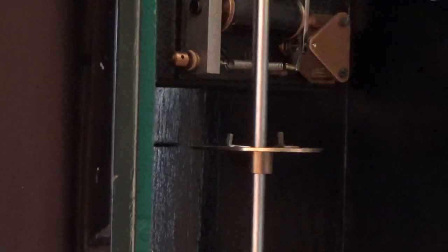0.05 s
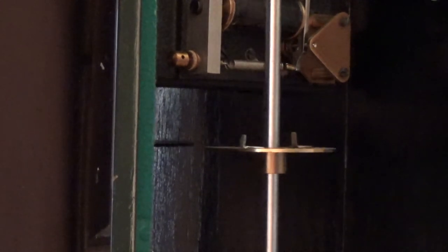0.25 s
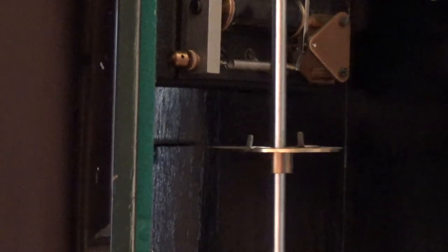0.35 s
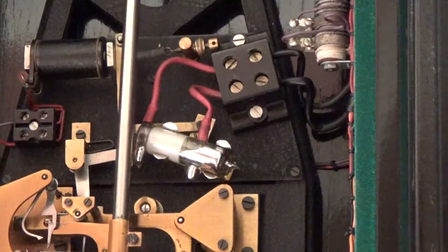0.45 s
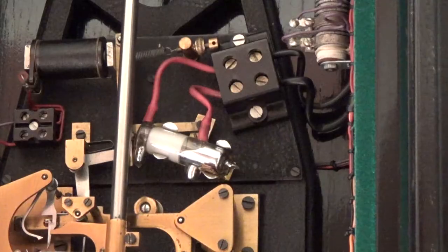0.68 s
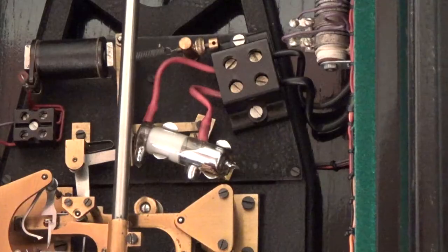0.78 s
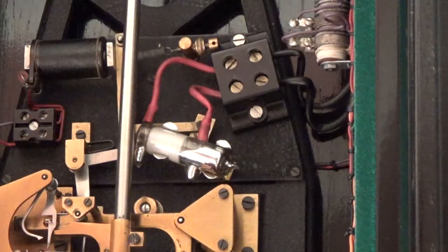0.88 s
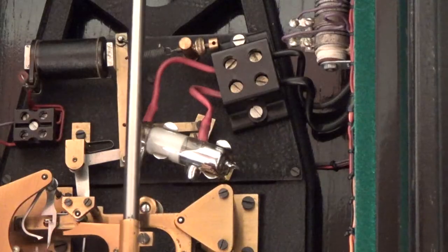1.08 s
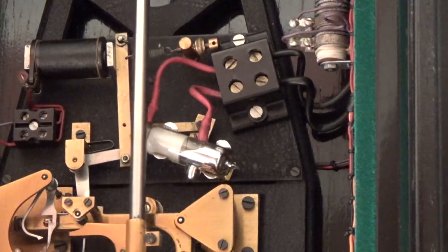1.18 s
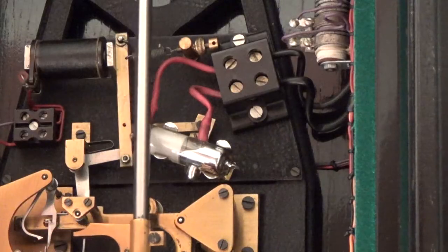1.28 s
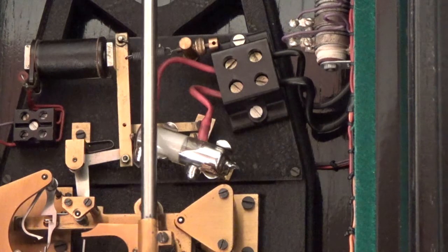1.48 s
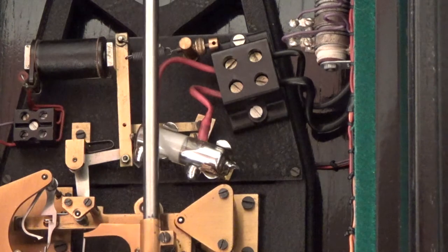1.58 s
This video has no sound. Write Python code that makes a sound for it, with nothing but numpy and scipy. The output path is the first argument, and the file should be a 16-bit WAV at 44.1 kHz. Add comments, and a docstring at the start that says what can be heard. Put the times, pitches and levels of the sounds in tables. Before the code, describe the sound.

Sharp mechanical clock ticks and a lever's double knock in a quiet room.

```python
"""An electric pendulum clock, close up in its wooden case in a quiet room.
A steel catch clicks free with a bright scrape and ring, and a lever lands with a double knock that
sets its mounting board ringing. A soft, hollow tap sounds in the case, and a second after the first
click the steel ticks again. Underneath sit a faint, pulsing electrical whine and a steady hiss."""
import sys
import numpy as np
from scipy import signal
from scipy.fft import rfft, irfft, next_fast_len
from scipy.io import wavfile

SR = 44100
rng = np.random.default_rng(int(sys.argv[2]) if len(sys.argv) > 2 else 0)


def unload_audio(sound):
    """Save the sound as a 16-bit wav file, at the path given as the first command line argument."""
    columns = np.transpose(np.atleast_2d(sound))
    # keep every value between -1 and 1, then stretch to whole-number steps
    steps = np.round(np.clip(columns, -1, 1) * 32767)
    wavfile.write(sys.argv[1], SR, steps.astype(np.int16))


N = 72765

# Steel clicks. Each row: start in seconds; ring, scrape, catch, case ring and case wash levels in dB;
# stretch factor on the steel's attack and decay; ring tilt in dB per octave.
CLICK_CUES = [(0.2083, -54, -33.5, -43.5, -62, -55, 0.13, 9),
              (0.2195, -42.5, -32, -46.5, -46, -38, 0.94, 11), (1.2443, -34.5, -33, -56, -41, -46, 1.01, 3)]
# Lever knocks. Each row: start in seconds; ring, crack, thud and snap in dB; ring tilt in dB per octave.
KNOCK_CUES = [(.069, -47, -61.5, -64, -75, -10), (0.18, -61, -75, -53, -80, -2),
              (.2052, -47.5, -56.5, -62, -65, 6), (0.2152, -56, -48.5, -63, -46, 12),
              (0.242, -30, -32, -43.5, -40, 3.5), (0.2522, -22.5, -33, -50.5, -38.5, -1),
              (.3762, -39.5, -55.5, -68, -70, -5.5)]
# The soft tap. Its row: start in seconds, level in dB.
TAP_CUES = [(.941, -50.5)]

# Ringing parts. Each row: pitch in Hz, relative level in dB, base time to fall 60 dB in seconds.
STEEL_MODES = [(5536, -1, .11), (5420, -8, .025), (5730, -11, .04), (7290, -20, .07), (9354, -7, .135),
               (9793, -.5, .08), (9870, -8, .045), (11060, -14, .08), (11680, -11, .075), (12440, -15, .06),
               (13760, -20, .09)]
CATCH_MODES = [(3890, -1, .075), (4450, -7, .04), (5250, -4, .04), (6100, -5, .035)]  # the small catch as it slips
CASE_MODES = [(732, -12, .15), (985, 0, .12), (2075, -7.5, .14), (2670, -14, .17)]
BOARD_MODES = [(319.4, -14, 0.21), (716, -4, 0.052), (762.5, -2.5, 0.066), (864, -18.5, 0.084),
               (985, -7.5, 0.022), (1042, -6.5, 0.038), (1157, -15, 0.084), (1390, -21, 0.1),
               (1740, -16.5, .04), (1832, -13.5, .04), (2130, -22, 0.036), (2510, -18.5, 0.042),
               (3500, -43, .03)]  # the lever and its mounting board
TAP_MODES = [(565, -10, .3), (770, -10, .3), (865, -4, .48), (1050, -2, .09), (2070, -14, .15)]

# Noise colours. Each row: frequency in Hz, relative level in dB.
SCRAPE_EQ = [(2500, -28), (4000, -19), (5400, 2), (6800, -14), (8500, -5.5), (10000, 0.5), (12500, 2),
             (15500, -3)]  # steel sliding off the catch
CASE_WASH_EQ = [(200, -10), (550, -11.5), (800, -2), (1100, 1), (1500, -2.5), (2000, -3), (2600, -18),
                (4000, -19.5)]  # the diffuse ring of the case
SNAP_EQ = [(1500, -8), (3000, 6), (5000, 5), (8500, -4.5), (10500, -12), (15000, -17)]  # the lever's instant of contact
CRACK_EQ = [(300, -4.5), (550, -5.5), (720, -21), (1100, 10), (1520, -26), (1800, 3.5), (2500, -10),
            (3500, -8.5), (5000, -17.5), (8000, -49), (15000, -34)]  # a knock's midrange bite
THUD_EQ = [(30, -21), (70, 1), (150, 0), (300, 2.5), (500, -23), (900, -27)]  # its low weight
ROOM_EQ = [(30, -5), (48, 14), (80, 6.5), (125, 1), (200, -3.5), (330, -3.5), (500, -12), (760, 2.5),
           (1200, -16), (2500, -13.5), (6000, -22)]  # its tail in the room
RATTLE_EQ = [(350, -27), (600, 9), (900, 4), (1200, 2), (1600, -30), (4000, -8), (7000, -20)]  # the tap's rattle
HISS_EQ = [(20, -36), (32, -8), (48, -4), (76, -9.5), (130, -9.5), (300, -10.5), (520, -11.5), (690, -11.5),
           (880, -10), (1980, -17), (3050, -18.5), (4820, -22), (15800, -28)]  # the background bed

# Stereo image of the hits and the hiss. Each row: frequency in Hz, left-right likeness (1 is mono).
HIT_IMAGE = [(100, 1), (700, 0.96), (1500, .65), (3000, 0.32), (6000, .8), (13000, 1)]
HISS_IMAGE = [(60, 1), (150, 0.93), (380, 0.36), (950, 0.17), (2400, 0.17), (6000, 0.77), (15000, 1)]
# A brief dip in the whole mix. Each row: time in seconds, gain in dB.
LEVEL_DIP = [(.412, 0), (.427, -4), (.438, -22), (.4505, -22), (.452, 0)]

CLICK_RISE_S, KNOCK_RISE_S = 0.00074, 0.00066
CASE_DELAY_S, CASE_RISE_S = 0.003046, 0.0053


def steel_clicks():
    """Steel slips off the catch: a bright scrape and a short ring, and the case answers just after."""
    out = np.zeros((2, N))
    for start, ring_db, scrape_db, catch_db, case_db, wash_db, stretch, tilt_db in CLICK_CUES:
        rise = CLICK_RISE_S * stretch
        scrape = burst(start, SCRAPE_EQ, rise, t60=0.026 * stretch)
        tail = amp(-11) * burst(start, SCRAPE_EQ, rise, t60=0.12 * stretch)
        out += amp(scrape_db) * (scrape + tail)
        out += amp(catch_db) * ring(start, CATCH_MODES, rise, stretch)
        out += amp(ring_db) * ring(start, tilted(STEEL_MODES, tilt_db, pivot_hz=7500), rise, stretch)
        case_start = start + CASE_DELAY_S
        out += amp(case_db) * ring(case_start, CASE_MODES, CASE_RISE_S)
        out += amp(wash_db) * burst(case_start, CASE_WASH_EQ, CASE_RISE_S, t60=0.15)
    return out


def lever_knocks():
    """The lever lands: a snap, a crack, a low thud and the board's ring, which lingers in the room."""
    out = np.zeros((2, N))
    low_cut = signal.butter(2, 675, "highpass", fs=SR, output="sos")  # a small board radiates little bass
    for start, ring_db, crack_db, thud_db, snap_db, tilt_db in KNOCK_CUES:
        board = ring(start, tilted(BOARD_MODES, tilt_db, pivot_hz=730), KNOCK_RISE_S)
        room_tail = amp(-30) * burst(start, ROOM_EQ, rise=0.022, t60=0.58)
        out += amp(ring_db) * (signal.sosfilt(low_cut, board) + room_tail)
        out += amp(snap_db) * burst(start, SNAP_EQ, KNOCK_RISE_S, t60=0.017)
        out += amp(crack_db) * burst(start, CRACK_EQ, KNOCK_RISE_S, t60=0.051)
        out += amp(thud_db) * burst(start, THUD_EQ, KNOCK_RISE_S, t60=0.087)
    return out


def hollow_tap():
    """A light contact elsewhere in the works rings hollow and rattles."""
    out = np.zeros((2, N))
    for start, level_db in TAP_CUES:
        body = ring(start, TAP_MODES, KNOCK_RISE_S)
        rattle = amp(-3.5) * burst(start, RATTLE_EQ, KNOCK_RISE_S, t60=0.22)
        out += amp(level_db) * (body + rattle)
    return out


def electrical_whine():
    """A thin electrical whine comes in short, even pulses, each sagging in pitch."""
    pitch_hz, sag_hz_per_s = 2605, 8100
    first_s, rate_hz, width_s = 0.0175, 25.19, 0.004
    out = np.zeros(N)
    for centre in np.arange(first_s, N / SR, 1 / rate_hz):
        t = np.arange(N) / SR - centre
        cycles = pitch_hz * t - 0.5 * sag_hz_per_s * t ** 2 + rng.random()
        pulse = np.exp(-0.5 * (t / width_s) ** 2)
        out += pulse * np.sin(2 * np.pi * cycles)
    return amp(-60) * out


def hiss():
    """A steady bed of soft noise, widest in the mids."""
    return amp(-57.5) * noise(HISS_EQ, HISS_IMAGE)


def ring(start, modes, rise, stretch=1):
    """Struck modes, slightly unsteady, each reaching the two ears a little differently."""
    blur, spread = 0.0022, 0.22  # line width as a share of pitch; side gain against mid
    age = since(start)
    out = np.zeros((2, N))
    for hz, db, t60 in modes:
        jitter = np.sqrt(2 * np.pi * blur * hz / SR) * rng.standard_normal(N) * (age > 0)
        phase = 2 * np.pi * hz * age + np.cumsum(jitter)
        mid = np.sin(phase)
        side = spread * np.sin(phase + rng.uniform(0, 2 * np.pi))
        out += amp(db) * envelope(start, rise, t60 * stretch) * np.array([mid + side, mid - side])
    return out


def tilted(modes, tilt_db, pivot_hz):
    """Tilts mode levels about a pivot: a harder contact favours the higher modes."""
    return [(hz, db + tilt_db * np.log2(hz / pivot_hz), t60) for hz, db, t60 in modes]


def burst(start, eq, rise, t60):
    """Many crowded resonances, struck at once and dying together."""
    return noise(eq, HIT_IMAGE) * envelope(start, rise, t60)


def envelope(start, rise, t60):
    """The shape of a hit: quick attack, then a decay of 60 dB in t60 seconds."""
    age = since(start)
    return (1 - np.exp(-age / rise)) * np.exp(-np.log(1000) * age / t60)


def noise(eq, image):
    """Coloured stereo noise of rms 1, its width set by the image."""
    def mid_side_gains(hz):
        angle = np.arccos(np.clip(curve_at(image, hz), -1, 1)) / 2
        return amp(curve_at(eq, hz)) * [np.cos(angle), np.sin(angle)]

    mid, side = filtered(rng.standard_normal((2, N)), mid_side_gains)
    stereo = np.array([mid + side, mid - side])
    return stereo / stereo.std()


def filtered(x, response):
    """Shapes x with a gain for each frequency."""
    size = next_fast_len(N + 8192)
    gains = response(np.fft.rfftfreq(size, 1 / SR))
    return irfft(rfft(x, size) * gains, size)[..., :N]


def curve_at(points, hz):
    """Reads a breakpoint curve on a log frequency axis."""
    freqs, values = np.transpose(points)
    return np.interp(np.log(hz + 1), np.log(freqs + 1), values)


def since(start):
    """Seconds since start, zero before it."""
    return np.maximum(np.arange(N) / SR - start, 0)


def amp(db):
    """Decibels to gain."""
    return 10 ** (np.asarray(db) / 20)


def scene():
    """The clockwork over its bed of hiss and whine."""
    return steel_clicks() + lever_knocks() + hollow_tap() + hiss() + electrical_whine()


def record(dry):
    """The level dips once, briefly, and the very top of the treble is cut throughout."""
    top_hz = 15850
    dip_db = np.interp(np.arange(N) / SR, *np.transpose(LEVEL_DIP))
    return filtered(dry * amp(dip_db), lambda hz: hz < top_hz)


dry = scene()
out = record(dry)
unload_audio(out)
```